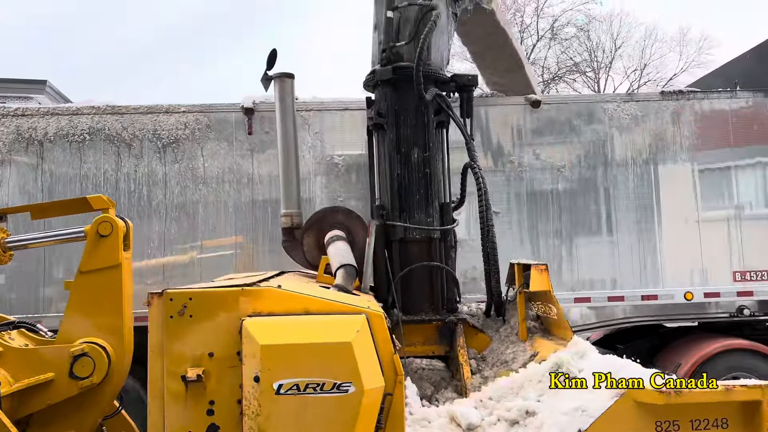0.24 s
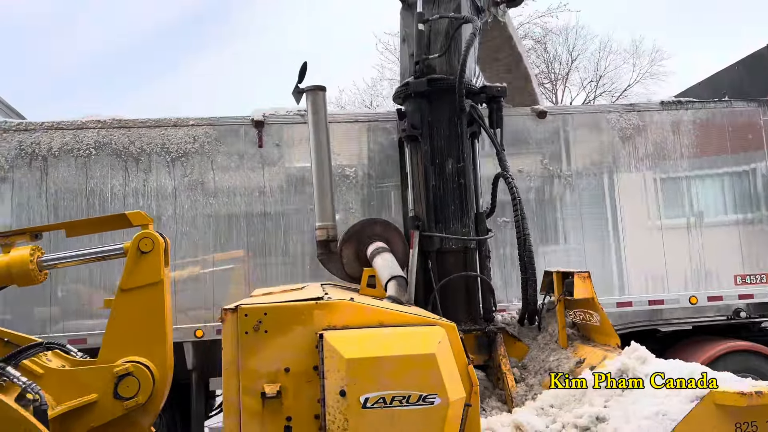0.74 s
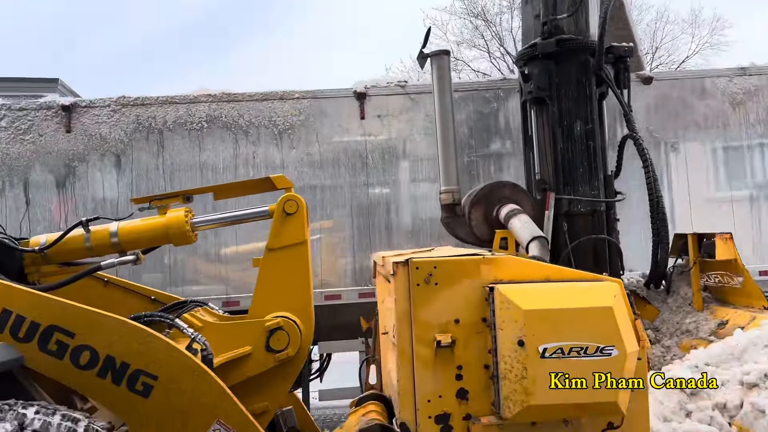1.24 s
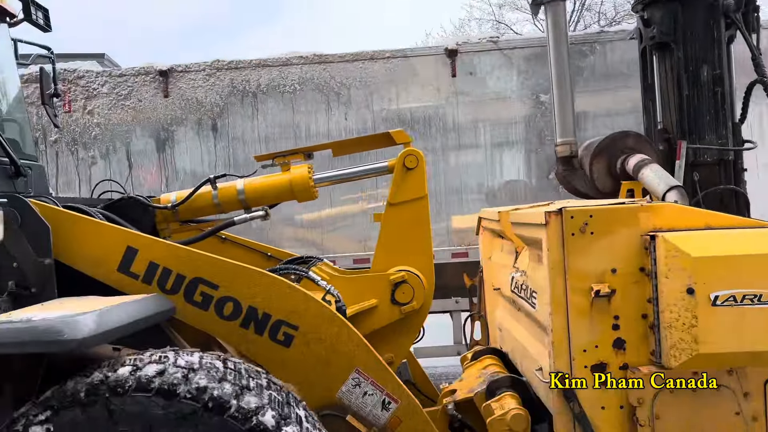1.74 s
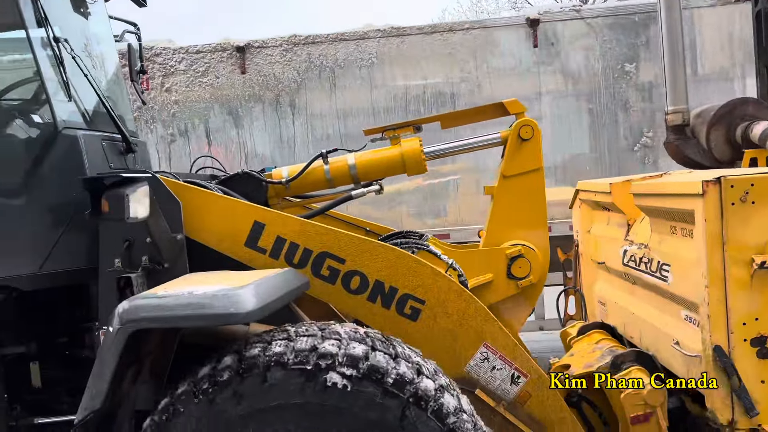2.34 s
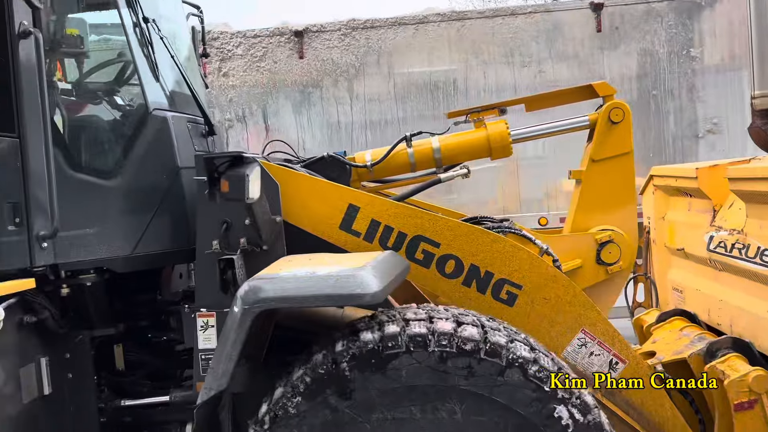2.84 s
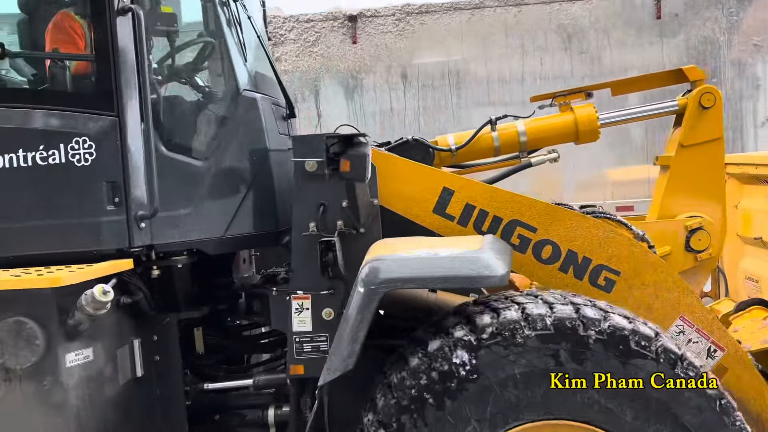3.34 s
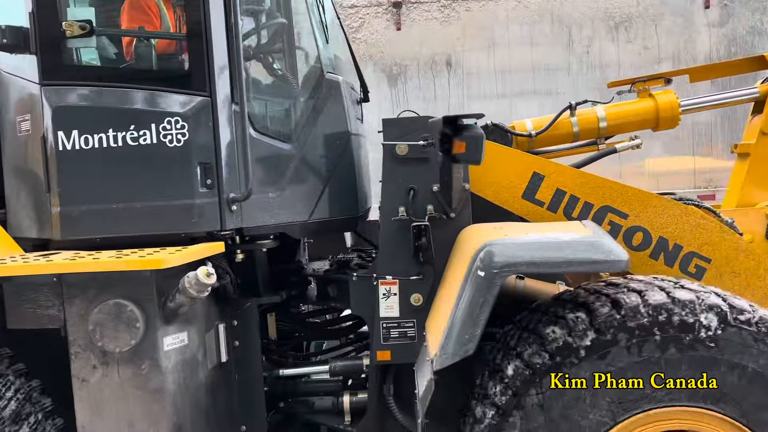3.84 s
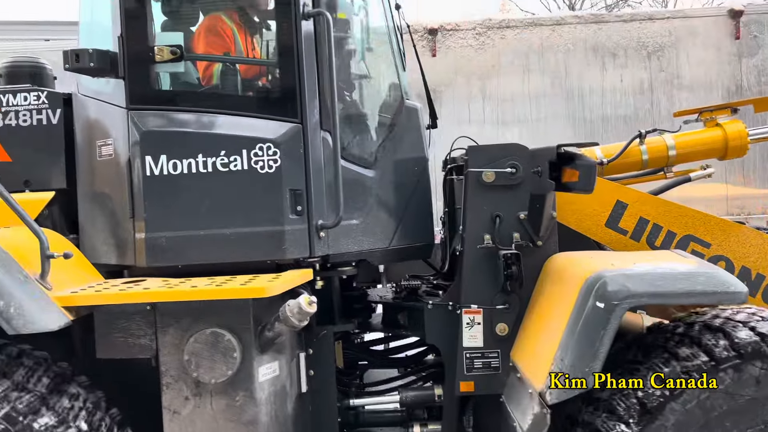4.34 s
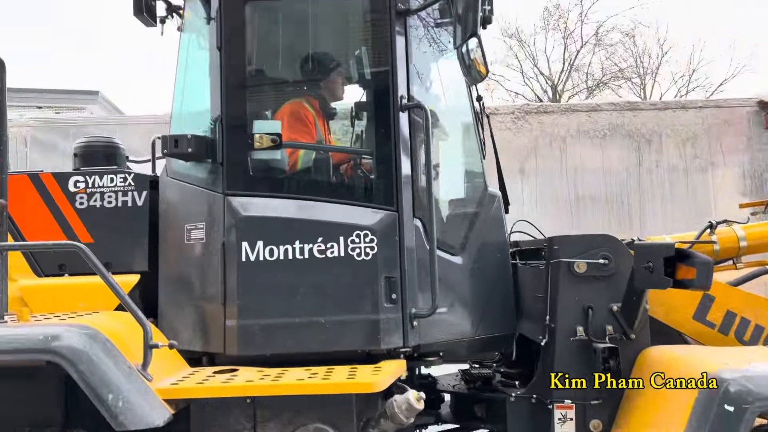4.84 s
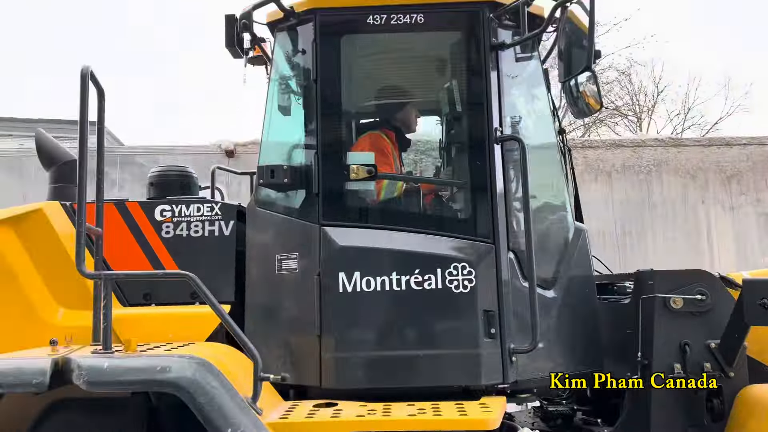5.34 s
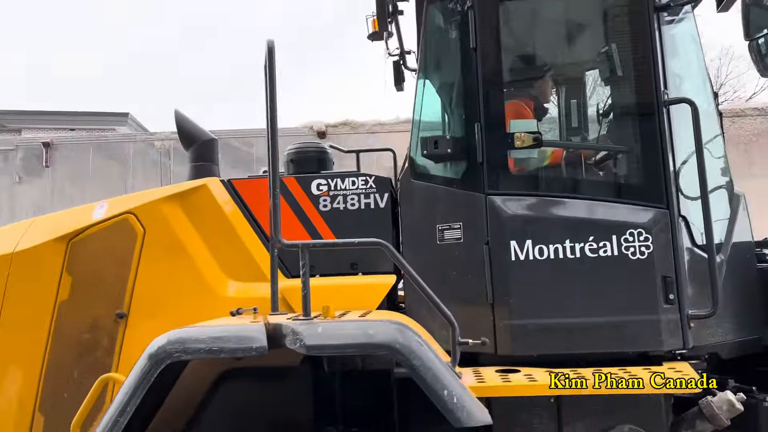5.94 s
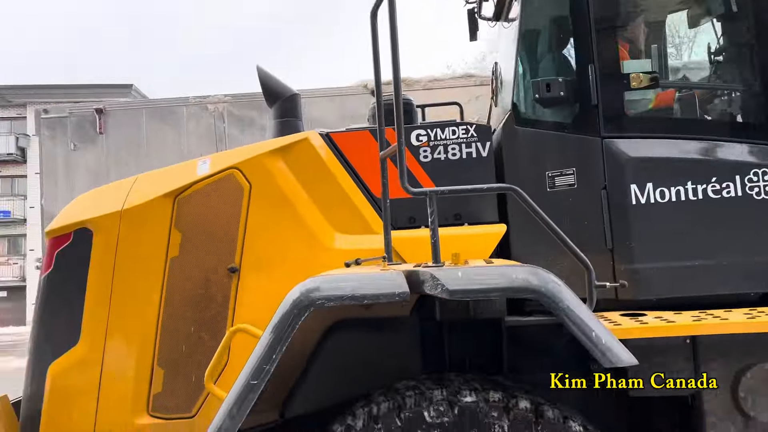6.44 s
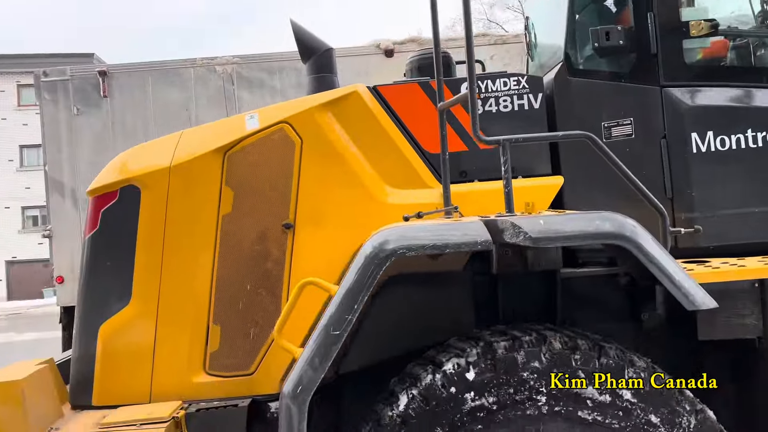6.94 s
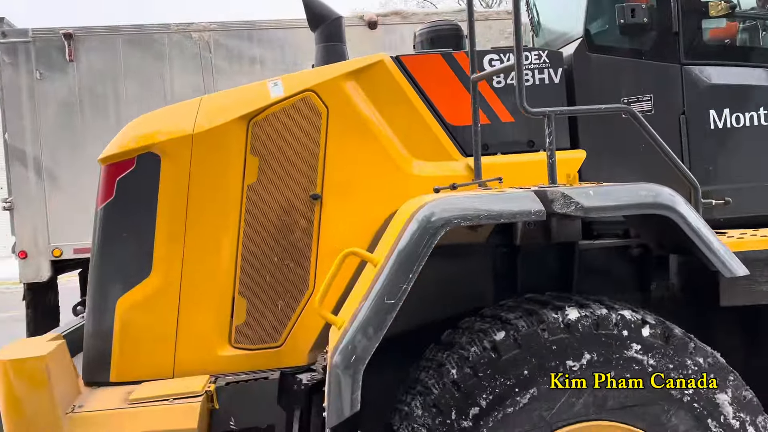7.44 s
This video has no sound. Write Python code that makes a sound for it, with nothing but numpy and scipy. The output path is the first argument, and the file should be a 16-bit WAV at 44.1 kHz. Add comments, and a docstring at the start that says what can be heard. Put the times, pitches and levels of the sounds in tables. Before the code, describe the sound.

On an open city street, a loader-mounted snowblower creeps past close to a stereo microphone. Its diesel throbs about twice a second beneath a broad roar of churned snow, a hollow howl and rattling steel. The snow chute scours and buzzes, one lump of ice clacks, and hydraulic whines surge. The blower drifts right and recedes, leaving the loader's steady drone, exhaust rumble and a faint high whistle, with a truck idling heavily beside.

```python
"""A big snowblower, pushed by a wheel loader, fills a trailer in the street; the rig creeps past the listener.
Its diesel throbs as beating partials; impeller and snow chute roar as coloured noise with ringing steel.
The loader follows with firing harmonics, exhaust rumble and cab boom; the trailer's truck runs beside them.
Pump and drive sing in surges of partials, gears whine and a turbocharger whistles as wavering tones.
A bright hiss of noise pulses at the loader's firing rate."""
import sys
import numpy as np
from scipy import signal
from scipy.fft import rfft, irfft, next_fast_len
from scipy.io import wavfile
from scipy.ndimage import map_coordinates

SR = 44100
rng = np.random.default_rng(int(sys.argv[2]) if len(sys.argv) > 2 else 0)


def store_wav(level_fs):
    """Save 16-bit WAV to argv[1]."""
    pcm = np.round(np.clip(np.atleast_2d(level_fs), -1, 1) * 32767)
    wavfile.write(sys.argv[1], SR, pcm.T.astype(np.int16))


N = 339129


def from_db(db):
    """Decibels to gain."""
    return np.exp(np.log(10) / 20 * np.asarray(db))


def rms_one(x):
    """Scale to an rms of 1."""
    return x / np.sqrt(np.mean(x ** 2) + 1e-20)


def in_time(rows):
    """One value per sample for each column of a curve."""
    time_s, *columns = np.transpose(rows)
    return [np.interp(np.arange(N) / SR, time_s, column) for column in columns]


def at_hz(points, hz):
    """Read a spectrum on a log-frequency axis."""
    known_hz, values = np.transpose(points)
    return np.interp(np.log(hz), np.log(known_hz), values)


def drift(rate_hz):
    """Slow chance with a spread of about 1: low-passed noise, drawn every 40 samples and interpolated."""
    r = np.exp(-80 * np.pi * rate_hz / SR)
    noise = rng.standard_normal(N // 40 + 2002)
    slow = rms_one(signal.lfilter([1], [1, -2 * r, r * r], noise)[2000:])  # start-up dropped
    ramp = np.arange(40) / 40
    return (slow[:-1, None] + np.diff(slow)[:, None] * ramp).ravel()[:N]


def angle(per_s):
    """Running angle of something that turns per_s times a second, from a random start."""
    return 2 * np.pi * (np.cumsum(per_s) / SR + rng.random())


# left-right likeness: (frequency [Hz], correlation [0-1])
LIKENESS = [(60, 1), (130, 0.85), (300, 1), (700, 0.64), (1400, 0.64), (3500, 0.87), (5500, 0.067),
            (8000, 1), (15000, 1)]


def turbulence(spectrum, resonances=(), direct=0):
    """Coloured stereo noise with resonances; street echoes make the sides differ, direct sound less so."""
    size = next_fast_len(N)
    hz = np.maximum(np.arange(size // 2 + 1) * SR / size, 1)
    inside = np.clip(hz, spectrum[0][0], spectrum[-1][0])
    skirts = np.minimum(hz / inside, inside / hz) ** 2
    gain = from_db(at_hz(spectrum, hz)) * skirts
    for centre_hz, width_hz, lift_db in resonances:
        gain = gain * from_db(lift_db / (1 + (2 * (hz - centre_hz) / width_hz) ** 2))
    alike = np.clip(direct + (1 - direct) * at_hz(LIKENESS, hz), 0, 1)
    mid, side = rfft(rng.standard_normal((2, size)))
    pair = np.sqrt(1 + alike) * mid + np.sqrt(1 - alike) * side * [[1], [-1]]
    return rms_one(irfft(gain * pair, size)[:, :N])


def partials(turn, orders, rough, unrest_hz):
    """Multiples of a rotation, each wavering in strength and phase."""
    out = 0
    for multiple, level_db in orders:
        cycles = round(multiple) * turn / (2 * np.pi) + rng.random()
        phase = np.float32(2 * np.pi * (cycles - np.floor(cycles)))
        in_phase = (1 + rough * drift(unrest_hz)) * np.sin(phase)
        quadrature = rough * drift(unrest_hz) * np.cos(phase)
        out = out + from_db(level_db) * (in_phase + quadrature)
    return rms_one(out)


def whistle(hz, width_hz, steady):
    """A tone with a clean core and a noisy skirt."""
    turn = angle(hz)
    return rms_one((steady + drift(width_hz)) * np.sin(turn) + drift(width_hz) * np.cos(turn))


def hump(middle_s, length_s):
    """A smooth rise to 1 and fall, length_s wide at half height."""
    return 1 / (1 + np.square(np.square(2 * (np.arange(N) / SR - middle_s) / length_s)))


def surges(rows, idle_db):
    """Gain that rises from idle, holds and falls back at each surge."""
    swell = sum(from_db(db) * hump(middle_s, length_s) for middle_s, length_s, db in rows)
    return np.hypot(from_db(idle_db), swell)


def singing(rows, firings, waver, rough, unrest_hz):
    """Resonances swell one by one, glide with the engine, waver in pitch and flutter each on its own."""
    out, t = np.zeros(N), np.arange(N) / SR
    turn = angle(firings * (1 + waver * drift(19.3)))
    flutter = 1 + rough * (drift(unrest_hz) + 1j * drift(unrest_hz))
    flutter = flutter / np.sqrt(1 + 2 * rough ** 2)
    for (middle_s, length_s, hz, db), chance in zip(rows, rng.random(len(rows))):
        near = np.arange(*np.searchsorted(t, [middle_s - 2 * length_s, middle_s + 2 * length_s]))
        glide = np.exp(1j * turn[near] * hz / np.interp(middle_s, t, firings))
        tone = flutter[(near + int(chance * N)) % N] * glide
        swell = 1 / (1 + np.square(np.square(2 * (t[near] - middle_s) / length_s)))
        out[near] += from_db(db) * np.sqrt(2) * tone.real * swell
    return out


# each part's pass: (abreast [s], time for direct sound to fall 3 dB [s], direct gain abreast [dB],
# steady gain off the street [dB])
PASSES = { "blower rumble": (1.0, 1.86, -18.5, -39.5), "blower beat": (0.45, 1.0, -19.5, -36),
          "blower chug": (0.56, 0.36, -19.5, -39), "blower note": (0.7, 1, -18.5, -30),
          "blower fan": (0.13, 1.5, -28, -60), "impeller": (1.38, 2.1, -23.5, -56),
          "chute": (2, 1.05, -29.5, -42), "gears": (2, 1.5, -44.5, -65), "turbo": (-1, 2.5, -42, -55.5),
          "loader overtone": (3.5, 0.5, -39.5, -61), "cab boom": (3, 0.16, -27.5, -53),
          "loader fan": (4, 0.67, -29, -62), "loader note": (5, 0.16, -26, -28.5),
          "loader rumble": (8, 2, -25, -43), }


def passing(part):
    """Gain of a part going by: direct sound as 1 / distance, plus a steady share off the street."""
    abreast_s, width_s, near_db, street_db = PASSES[part]
    distance = np.hypot(1, (np.arange(N) / SR - abreast_s) / width_s)
    return np.hypot(from_db(near_db) / distance, from_db(street_db))


def place(x, lag_ms, pan_db=0):
    """A source to the right reaches the left ear later; the pan keeps the total power."""
    left, right = np.broadcast_to(x, (2, N))
    left = map_coordinates(left, [np.arange(N) - lag_ms * SR / 1000], order=3, mode="nearest")
    tilt = from_db(pan_db)
    return np.array([left * tilt, right]) * np.sqrt(2 / (1 + tilt ** 2))


AHEAD_S, SWING_S, SIDE_LAG_MS = 1, 2.95, 0.31  # straight ahead, time to 45 degrees, lag fully right


def bearing():
    """Left-ear delay [ms] of the drum as it moves to the right."""
    return SIDE_LAG_MS * np.sin(np.arctan((np.arange(N) / SR - AHEAD_S) / SWING_S))


# stereo leans of two bands: (time [s], centre [Hz], left over right [dB])
RIGHT_LEAN = [(0, 620, -5), (.9, 680, -7.5), (1.4, 780, -11), (2.6, 955, -10), (4.3, 1110, -8),
              (7.69, 1102, -2.5)]
LEFT_LEAN = [(0, 2520, 2), (2.1, 2900, 5.5), (3.3, 2600, 3.5), (5, 2600, 2), (6.5, 2800, -3)]
RIGHT_LEAN_OCTAVES, LEFT_LEAN_OCTAVES = 0.91, 0.32
WIDE_HZ, WIDE_OCTAVES, WIDE_EXTRA = 668, 0.58, 1.77  # band centre, width, extra share of the lag


def widen(x, lag_ms):
    """Exaggerate the bearing in the mids: extra lag and level lean there, another lean higher up."""
    hz, t, spectra = signal.stft(x, SR, nperseg=512)
    octaves = np.log2(np.maximum(hz, 1))[:, None]
    leans = []
    for rows, width in ((RIGHT_LEAN, RIGHT_LEAN_OCTAVES), (LEFT_LEAN, LEFT_LEAN_OCTAVES)):
        time_s, centre_hz, db = np.transpose(rows)
        off_centre = octaves - np.log2(np.interp(t, time_s, centre_hz))
        leans.append(np.interp(t, time_s, db) * np.exp(-(off_centre / width) ** 2))
    tilt = from_db(sum(leans))
    band = np.exp(-((octaves - np.log2(WIDE_HZ)) / WIDE_OCTAVES) ** 2)
    lag_s = np.interp(t, np.arange(N) / SR, lag_ms) / 1000
    twist = np.exp(1j * np.pi * WIDE_EXTRA * band * hz[:, None] * lag_s)  # half the lag on each side
    pair = spectra * np.array([tilt / twist, twist]) * np.sqrt(2 / (1 + tilt ** 2))
    return signal.istft(pair, SR, nperseg=512)[1][:, :N]


# truck hauling the trailer: (time [s], firing rate [Hz], level [dB])
TRUCK = [(0, 114, -26), (2, 95, -34), (2.9, 105, -30), (3.7, 95, -33), (6.8, 87.6, -28), (7.69, 108, -30.5)]
# (multiple of crank rate, relative level [dB])
TRUCK_ORDERS = [(2, -4.5), (3, -2), (7, -8)]


def truck():
    """A six-cylinder diesel fires three times a turn."""
    firings, level_db = in_time(TRUCK)
    crank = angle(firings / 3)
    return place(from_db(level_db) * partials(crank, TRUCK_ORDERS, rough=0.54, unrest_hz=2.1), lag_ms=0.72)


# (time [s], pitch [Hz])
TURBO = [(0, 11900), (1.3, 12250), (2.0, 12320), (3.0, 12170), (4.1, 11980), (5.2, 12130), (5.6, 11930),
         (6.35, 11530), (7.1, 11860), (7.69, 11880)]


def turbocharger():
    """A high whistle that glides in pitch and flickers in level."""
    pitch_hz, = in_time(TURBO)
    flicker = rms_one(from_db(3.5 * drift(5)))
    return passing("turbo") * flicker * whistle(pitch_hz, width_hz=110.0, steady=0.45)


# (frequency [Hz], relative density [dB per Hz])
HISS = [(2200, -3.5), (2850, 0), (3300, -2.5), (3800, -4.5), (4700, -5), (5500, -8), (6500, -5.5),
        (7400, -6), (8700, -5.5), (11500, -6.5), (13000, -15), (15500, -13)]
# (time [s], relative level [dB])
HISS_LEVEL = [(0.0, -36), (0.02, -38.5), (0.51, -38.5), (0.75, -38), (1.09, -39.5), (4.39, -42),
              (5.57, -46.5), (7.65, -46.5), (7.69, -46)]


def hiss(firing, pulse_depth, flutter_db, grit_db):
    """Bright noise that pulses at the firing rate, flutters and is slightly gritty."""
    level_db, = in_time(HISS_LEVEL)
    unrest = from_db(flutter_db * drift(23) + grit_db * drift(200))
    swell = (1 + pulse_depth * np.cos(firing)) * unrest
    return from_db(level_db + 8.5) * rms_one(swell * turbulence(HISS))


# (middle [s], length [s], level [dB])
WHIRR_SURGES = [(6.25, 1.5, -43.5), (6.3, 0.3, -49)]
# (time [s], mean pitch [Hz])
WHIRR = [(5.75, 2580), (6.0, 2490), (6.3, 2400), (6.7, 2490), (7.2, 2540)]


def whirr(warble):
    """A rough whirr, near twice the impeller drive's pitch, warbles and flutters as it sags."""
    pitch_hz, = in_time(WHIRR)
    flutter = rms_one(from_db(1.7 * drift(30)))
    tone = whistle(pitch_hz * (1 + warble * drift(24.9)), width_hz=75.0, steady=.1)
    return surges(WHIRR_SURGES, idle_db=-66) * flutter * tone


# (multiple of firing rate, relative level [dB])
LOADER_ORDERS = [(1, 1), (2, -9.5), (3, -20), (4, -13)]
# exhaust gas: (frequency [Hz], relative density [dB per Hz])
LOADER_RUMBLE = [(15, -28), (28, -7), (44, -9), (62, 2.5), (90, 4.5), (140, -11), (220, 0.5), (300, -15),
                 (450, -21), (650, -14.5), (900, -40)]
# cab and panels: (frequency [Hz], relative density [dB per Hz])
CAB_BOOM = [(140, -27), (172, -10), (215, -1), (265, 1), (310, -2.5), (400, -18)]


def loader_engine(firings, lumps):
    """Diesel firing harmonics over lumpy exhaust rumble and the boom of cab and panels."""
    note = passing("loader note") * partials(angle(firings), LOADER_ORDERS, rough=0.1, unrest_hz=14.0)
    overtone = partials(angle(firings), [(4, 0)], rough=.25, unrest_hz=4.0)
    rumble = passing("loader rumble") * turbulence(LOADER_RUMBLE)
    rumble = rumble + passing("cab boom") * turbulence(CAB_BOOM)
    return note + passing("loader overtone") * overtone + lumps * rumble


def fans(shaft):
    """Both cooling fans share one blade tone at six times the blower's shaft, with two passes."""
    return (passing("blower fan") + passing("loader fan")) * partials(shaft, [(6, 0)], rough=.5, unrest_hz=8.0)


# panels and exhaust pipes: (middle [s], length [s], pitch at middle [Hz], level [dB])
BOOMS = [(.03, .14, 153.3, -22), (1.27, 0.22, 186.5, -21.5), (1.5, 0.16, 95.7, -19.5), (2.11, 0.1, 96, -23),
         (2.45, 0.13, 96.5, -26), (2.47, .15, 154, -23), (2.69, 0.13, 97.5, -24), (2.87, 0.075, 96, -27),
         (2.9, 0.2, 155, -34), (4.25, 0.096, 211.4, -27), (4.42, 0.19, 328, -33),
         (4.53, 0.092, 214.7, -25.5), (4.72, 0.087, 83.4, -26), (4.85, 0.39, 183.7, -27.5),
         (5.3, 0.35, 344.7, -38), (5.35, 0.56, 171.3, -28.5), (5.77, 0.14, 85.3, -25),
         (6.12, 0.4, 216, -32), (6.57, 0.13, 212, -33), (6.62, 0.18, 95.9, -22), (6.72, .12, 63, -25),
         (6.83, 0.12, 213, -28.5), (7.67, .1, 216, -27)]


def booms(firings):
    """Panels and exhaust pipes boom briefly."""
    return singing(BOOMS, firings, waver=.004, rough=.15, unrest_hz=8.0)


# (middle [s], length [s], level [dB])
RASPS = [(.8, 0.72, -45.5)]


def rasp():
    """A brief narrow band of rasping noise as the blower goes by."""
    return surges(RASPS, idle_db=-68) * whistle(np.full(N, 4750), width_hz=120.0, steady=0)


# whine under load: (middle [s], length [s], level [dB])
GEAR_SURGES = [(.2, .4, -44), (.88, 0.48, -43), (1.33, 0.33, -42), (2.25, 0.55, -47), (3.0, 0.53, -46),
               (3.75, 0.8, -43), (4.6, 0.96, -48), (6.35, 0.5, -48), (7.2, 0.66, -48)]
# (multiple of gear rate, relative level [dB])
GEAR_ORDERS = [(3, 0), (4, 6)]
GEAR_IDLE_DB = -52


def gears(firings):
    """Gear teeth, geared to the engine speed, whine roughly as they take load."""
    turn = angle(10 * firings * (1 + .006 * drift(22)))
    teeth = partials(turn, GEAR_ORDERS, rough=1.7, unrest_hz=65.0)
    return np.hypot(passing("gears"), surges(GEAR_SURGES, GEAR_IDLE_DB)) * teeth


# whine under load: (middle [s], length [s], level [dB])
PUMP_SURGES = [(.58, 0.63, -31), (2.05, 0.31, -34), (3.0, 0.2, -30), (3.65, 0.45, -41), (4.2, 0.82, -31.5),
               (4.85, 0.74, -39), (5.2, 0.12, -25), (5.5, .3, -41), (6.27, 0.21, -29), (6.85, 0.23, -36),
               (7.3, 0.52, -35)]
# (multiple of pump rate, relative level [dB])
PUMP_ORDERS = [(3, -16), (4, -1), (6, -14), (8, -14)]
PUMP_IDLE_DB = -40


def pump(firings):
    """Hydraulic pump pistons, geared to the engine speed, whine up under load."""
    pistons = partials(angle(2.5 * firings), PUMP_ORDERS, rough=.5, unrest_hz=12.0)
    return surges(PUMP_SURGES, PUMP_IDLE_DB) * pistons


# taking up snow: (middle [s], length [s], level [dB])
DRIVE_SURGES = [(.15, .2, -30), (.52, 0.32, -26.5), (.85, 0.31, -31.5), (2.05, 0.34, -34),
                (2.48, 0.12, -31.5), (3.68, 0.54, -37.5), (4.12, 0.15, -29), (4.445, 0.17, -28.5),
                (4.72, 0.19, -34.5), (6.08, .15, -38.5), (6.35, 0.18, -40), (6.68, 0.18, -37),
                (7.2, .4, -46)]
DRIVE_IDLE_DB = -50


def impeller_drive(firings):
    """The impeller drive, geared to the engine speed, sings as it takes up snow."""
    tone = partials(angle(15.27 * firings), [(1, 0), (2, -19)], rough=.2, unrest_hz=22.0)
    return surges(DRIVE_SURGES, DRIVE_IDLE_DB) * tone


# lumps of ice: (time [s], level at impact [dB])
KNOCKS = [(2.343, -13)]
# (frequency [Hz], relative density [dB per Hz])
KNOCK = [(400, -11), (900, 5), (1500, -5), (2600, -18), (6000, -25)]
KNOCK_DECAY_S = 0.0027


def knocks():
    """Ice hits the drum: a short, dull clack of decaying noise."""
    t = np.arange(N) / SR
    gain = sum(from_db(db) * (t >= s) * np.exp(-np.abs(t - s) / KNOCK_DECAY_S) for s, db in KNOCKS)
    return turbulence(KNOCK, direct=0.98) * gain


# drum and chute: (middle [s], length [s], pitch at middle [Hz], level [dB])
RINGS = [(.2, 0.21, 785, -28), (.48, .18, 777, -31), (.5, .3, 607.5, -27), (.6, 1, 1650, -44),
         (.996, 0.16, 812, -30), (1.25, 0.16, 1225, -30), (1.34, 0.22, 630, -25), (1.35, .3, 2050, -39),
         (1.444, 0.17, 499, -32), (1.45, 0.15, 1010, -34), (1.45, 0.22, 1680, -39.5), (1.54, .12, 710, -32),
         (1.59, .1, 2340, -38), (1.61, 0.11, 2080, -37.5), (1.85, 0.23, 2300, -49), (1.9, 0.14, 878, -36),
         (2.0, 0.23, 1332, -31.5), (2.06, 0.2, 2140, -40), (2.08, 0.11, 2240, -41), (2.25, 0.45, 635, -34),
         (2.25, 0.18, 1095, -30), (2.37, 0.069, 712, -22.5), (2.43, 0.091, 1690, -37),
         (2.7, 0.34, 708, -36), (2.79, 0.12, 1050, -27.5), (2.98, 0.27, 706, -31.5),
         (3.0, 0.13, 1060, -27.5), (2.97, .3, 2400, -38), (3.13, 0.31, 2255, -40), (3.25, 0.26, 1056, -42),
         (3.3, .3, 1747, -41), (3.413, 0.075, 1300, -28), (3.52, 0.065, 790, -28), (3.55, 0.51, 1206, -36),
         (4.0, 0.53, 1965, -43), (4.357, 0.37, 619, -29.5), (4.9, .3, 2000, -41), (4.9, .9, 2200, -51),
         (5.5, .6, 1740, -42), (5.7, .2, 1310, -42), (6.08, .14, 612, -33), (6.15, .51, 354, -37),
         (6.3, .5, 715, -47), (6.3, .5, 1675, -49), (6.46, .12, 1520, -43), (6.9, .16, 1715, -44),
         (7.33, .42, 1730, -46)]


def rings(firings):
    """Resonances of drum and chute swell briefly."""
    return singing(RINGS, firings, waver=.004, rough=.45, unrest_hz=22.0)


# (frequency [Hz], relative density [dB per Hz])
CHUTE = [(1100, -4), (1450, 2), (1750, 2), (2050, 0.5), (2400, -1), (2570, -3), (2750, -11.5), (3600, -38)]
# sheet steel: (centre [Hz], width [Hz], lift [dB])
CHUTE_RINGS = [(1830, 70, 4.5), (1936, 40, 5.5), (2250, 53, 3.5)]
# (multiple of impeller shaft rate, relative level [dB])
BUZZ_ORDERS = [(50, -2), (55, 0), (58, -2.5), (64, -2.5), (69, -3), (74, -1.5), (81, -5)]


def chute(firings):
    """The stream of snow scours the chute; its walls ring and buzz with the shaft."""
    shaft = angle(firings * 3 / 8 * (1 + .005 * drift(5)))
    buzz = from_db(-5.5) * partials(shaft, BUZZ_ORDERS, rough=2.0, unrest_hz=7.0)
    scour = turbulence(CHUTE, CHUTE_RINGS, direct=0.32)
    return passing("chute") * rms_one(from_db(1.23 * drift(21)) * (scour + buzz))


# roar, and howl of the drum's mouth: (frequency [Hz], relative density [dB per Hz])
IMPELLER = [(230, -23), (330, 1), (450, 0.5), (530, 1), (600, 1), (680, -1.5), (780, 1), (950, 0),
            (1250, -1), (1420, -4.5), (1800, -16)]
HOWL = [(480, -9), (600, -0.5), (680, -6.5), (780, 1.5), (900, -12.5), (1050, -12.5), (1330, -8),
        (1450, -16), (1650, -26)]
# ringing steel drum: (centre [Hz], width [Hz], lift [dB])
DRUM = [(452, 16, 8.5), (711, 16, 5), (1040, 40, 6)]
# howl fades as the mouth turns away: (time [s], level over the churning snow's roar [dB])
MOUTH = [(0, 3.5), (1.6, -3.5), (2.4, -25)]
# (multiple of impeller shaft rate, relative level [dB])
RATTLE_ORDERS = [(16, -7), (19, -3.5), (20, 1.5), (23, 5.5), (24, 0), (26, 0), (28, 4), (30, 4.5),
                 (32, -0.5), (34, 1.5), (37, 4), (38, -1.5), (40, 1.5), (44, -5.5)]


def impeller(firings):
    """Snow churns in the drum in uneven lumps; the open mouth howls and shaft overtones come and go."""
    mouth_db, = in_time(MOUTH)
    shaft = angle(firings * 3 / 8)
    lumps = from_db(0.55 * drift(39))
    roar = turbulence(IMPELLER, DRUM) + from_db(mouth_db) * turbulence(HOWL, direct=0.75)
    rattle = from_db(-2.8) * partials(shaft, RATTLE_ORDERS, rough=1.7, unrest_hz=7.0)
    return passing("impeller") * lumps * (from_db(0.02) * roar + rattle)


# slow, uneven throb: (trough [s], depth [0-1])
TROUGHS = [(-.22, 1), (.21, 0.77), (.64, 0.57), (1.1, 0.6), (1.52, 0.4), (1.95, 0.7), (2.39, 0.3),
           (2.84, 0.6), (3.33, 0.4), (3.701, 0.4), (4.11, 0.5), (4.58, 0.75), (5.08, 0.5), (5.54, 0.3),
           (5.99, 1), (6.45, 0.9), (6.92, 0.4), (7.37, 0.84), (7.8, .8)]


def throb():
    """Gain of two close tones beating: round swells, narrow troughs."""
    trough_s, depth = np.transpose(TROUGHS)
    t = np.arange(N) / SR
    turn = 2 * np.pi * np.interp(t, trough_s, np.arange(len(trough_s)))
    return rms_one(np.abs(1 - np.interp(t, trough_s, depth) * np.exp(1j * turn)))


CHUG_S, CHUG_TROUGH_S, CHUG_DEPTH = .287, 0.21, 0.88  # period, time of a trough, depth 0-1


def chug():
    """Gain of a quicker, regular beat for the note at twice the blower's shaft rate."""
    turn = 2 * np.pi * (np.arange(N) / SR - CHUG_TROUGH_S) / CHUG_S
    return rms_one(np.abs(1 - CHUG_DEPTH * np.exp(1j * turn)))


# (multiple of blower shaft rate, relative level [dB])
BLOWER_BEAT = [(1, -32), (3, -7), (5, -2.5), (7, -8), (8, -12)]
# exhaust gas: (frequency [Hz], relative density [dB per Hz])
RUMBLE = [(15, -34), (28, -14), (44, -13), (57, -3), (72, -1), (97, -0.5), (112, -2.5), (140, -6.5),
          (190, -1.5), (235, -5), (280, -9), (350, -7), (470, -14), (700, -16.5)]
# booming body panels: (centre [Hz], width [Hz], lift [dB])
PANELS = [(168, 4.5, 9.5), (279, 6, 4.5), (371.3, 5.6, 4.5)]
PUFF_DEPTH = .35  # exhaust puffs, one each turn, 0-1


def blower_engine(firings, shaft, lumps):
    """A throbbing diesel: firing note, chug and uneven-cylinder multiples over puffing exhaust rumble."""
    beat = passing("blower beat") * partials(shaft, BLOWER_BEAT, rough=0.35, unrest_hz=3.9)
    note = throb() * partials(angle(1.49 * firings), [(1, 0)], rough=.12, unrest_hz=5.0)
    chugging = chug() * partials(shaft, [(2, 0)], rough=.15, unrest_hz=4.0)
    puffs = rms_one(1 + PUFF_DEPTH * np.cos(shaft))
    rumble = passing("blower rumble") * puffs * turbulence(RUMBLE, PANELS)
    return beat + passing("blower note") * note + passing("blower chug") * chugging + lumps * rumble


# brief dips and swells: (middle [s], length [s], change [dB])
SWINGS = [(0.63, 0.023, -6), (1.13, 0.12, -0.5), (1.91, .04, 2), (1.984, 0.043, -3.5), (2.077, 0.058, 1),
          (2.266, 0.042, 3), (3.3, 0.43, -2), (4.665, 0.014, -3), (5.065, 0.025, -12), (6.417, 0.06, -3),
          (6.593, 0.033, 2.5), (6.734, .08, 0)]
BLOWER_TURNS = .3695  # blower engine turns per loader firing


def engines(firings):
    """Both diesels and their fans, sharing rumble lumps and brief swings of level."""
    shaft = angle(firings * BLOWER_TURNS)
    lumps = from_db(1.0 * drift(17.0))
    swing = from_db(sum(db * hump(middle_s, length_s) for middle_s, length_s, db in SWINGS))
    both = blower_engine(firings, shaft, lumps) + loader_engine(firings, lumps) + fans(shaft)
    return place(swing * both, lag_ms=0.37)


# speed sags and recovers with the snow load: (time [s], loader firing rate [Hz])
SPEED = [(0, 81.9), (.6, 82.2), (1.1, 82.8), (1.35, 84.2), (1.6, 83.8), (2, 85.2), (2.25, 84.6), (2.55, 83),
         (2.85, 84.7), (3.05, 83.6), (3.4, 84.8), (3.75, 82.7), (4.2, 82), (4.8, 82.7), (5.08, 83.4),
         (5.24, 86.4), (5.45, 85.2), (5.9, 84.3), (6.1, 81.7), (6.35, 80.3), (6.8, 83), (7.24, 84.9),
         (7.69, 83.6)]
CHUTE_LAG_SHARE = 0.55  # chute stands nearer the middle than the drum


def scene():
    """Mix all sources; booms and turbocharger stay centred."""
    firings, = in_time(SPEED)
    lag_ms = bearing()
    whines = pump(firings) + impeller_drive(firings) + gears(firings) + whirr(warble=0.0121)
    drum = place(impeller(firings) + whines + rings(firings) + knocks(), lag_ms)
    snow = place(chute(firings) + rasp(), CHUTE_LAG_SHARE * lag_ms)
    bright = hiss(angle(firings), pulse_depth=0.072, flutter_db=0.91, grit_db=0.5)
    air = place(bright, lag_ms=0.2457, pan_db=0.6)
    wide = widen(drum + snow + air, lag_ms)
    return engines(firings) + booms(firings) + truck() + wide + turbocharger()


CUTOFF_HZ = 15900


def record(dry):
    """Round the highest peaks and cut the top."""
    rounded = 1.511 * np.tanh(dry / 1.701)
    low_pass = signal.ellip(10, .1, 90, CUTOFF_HZ, fs=SR, output="sos")
    return signal.sosfilt(low_pass, rounded)


dry = scene()
out = record(dry)
store_wav(out)
```